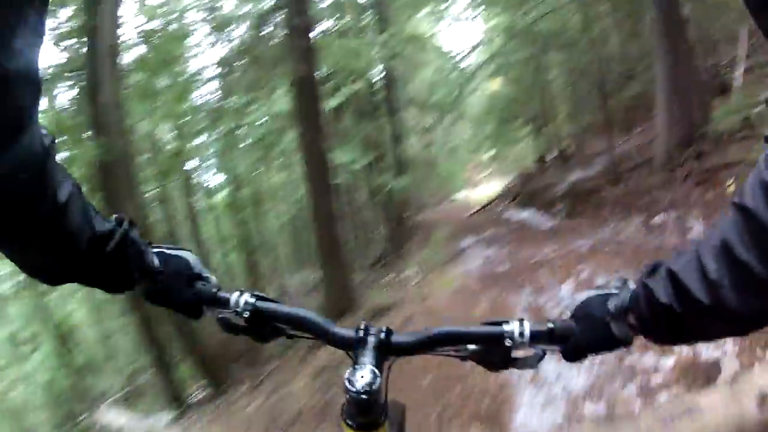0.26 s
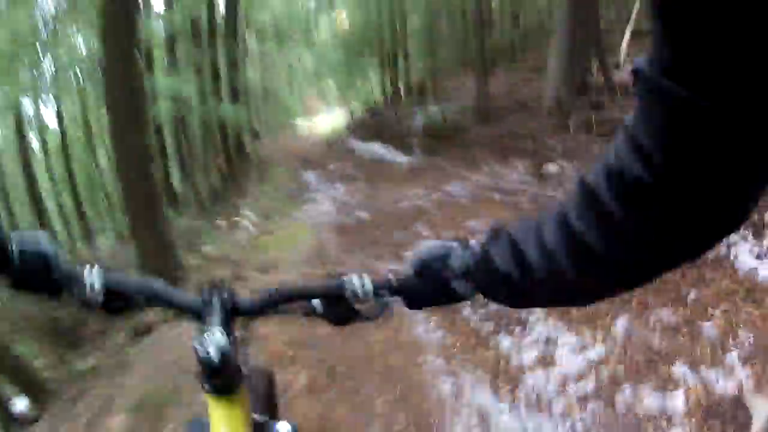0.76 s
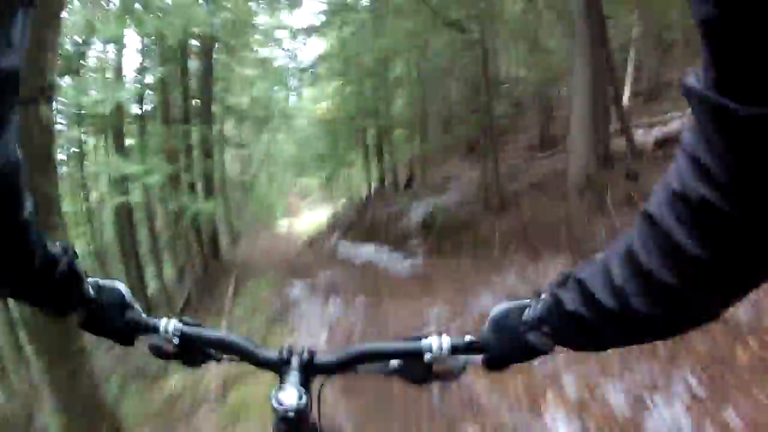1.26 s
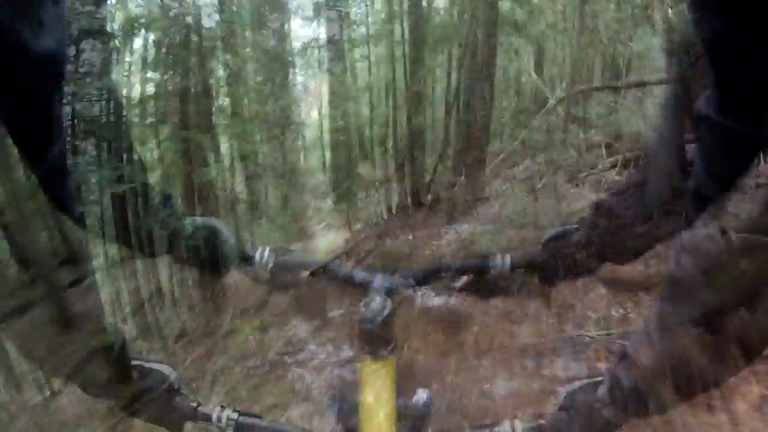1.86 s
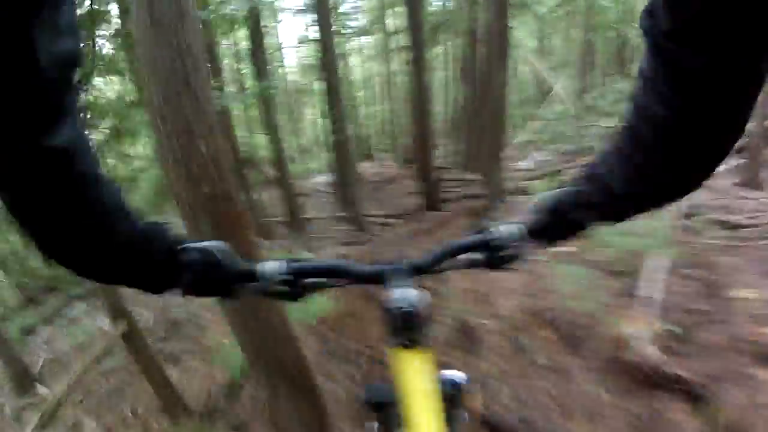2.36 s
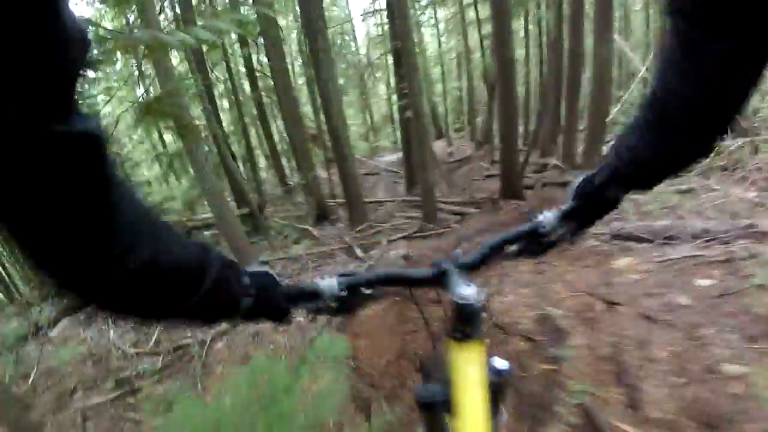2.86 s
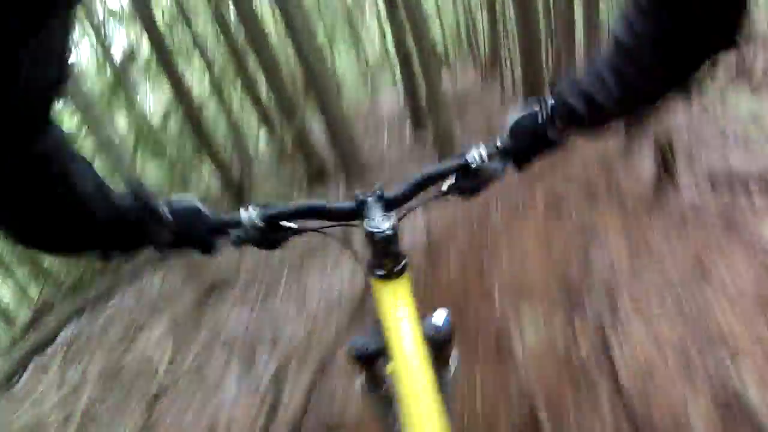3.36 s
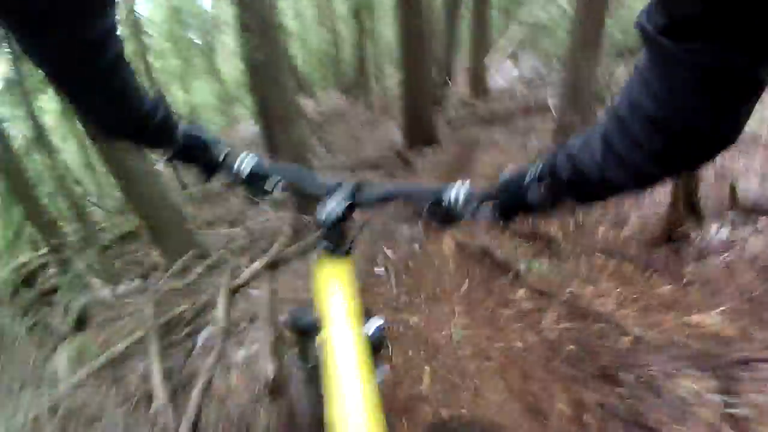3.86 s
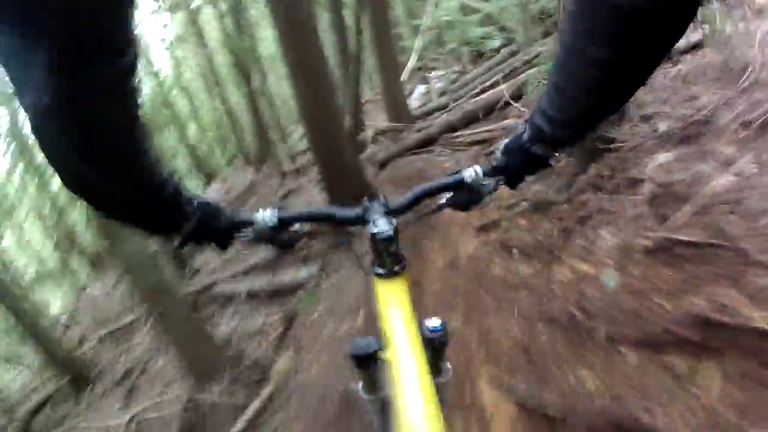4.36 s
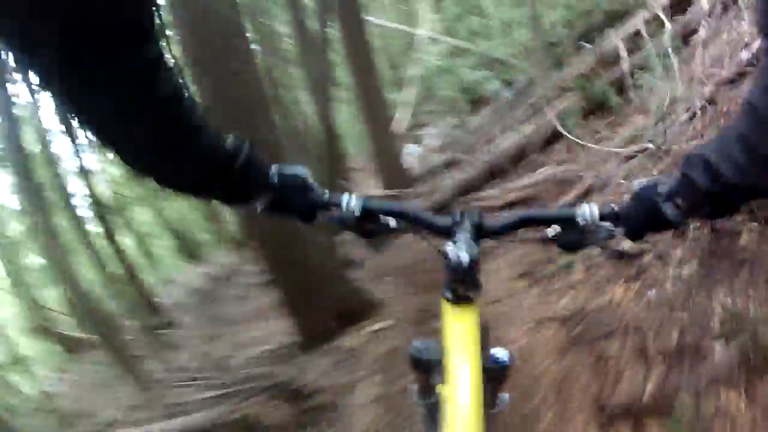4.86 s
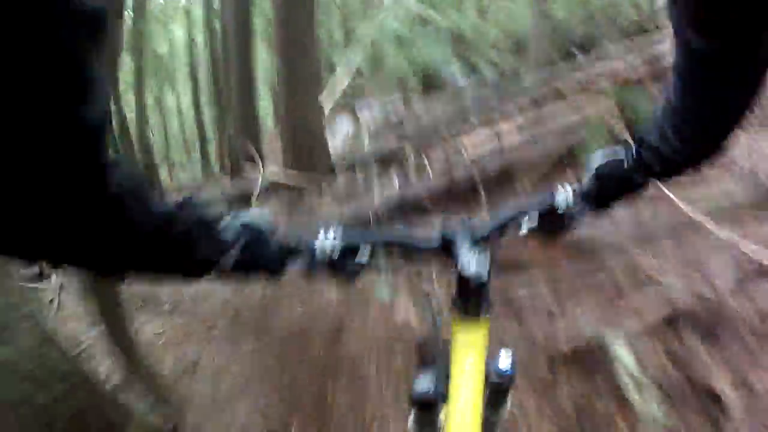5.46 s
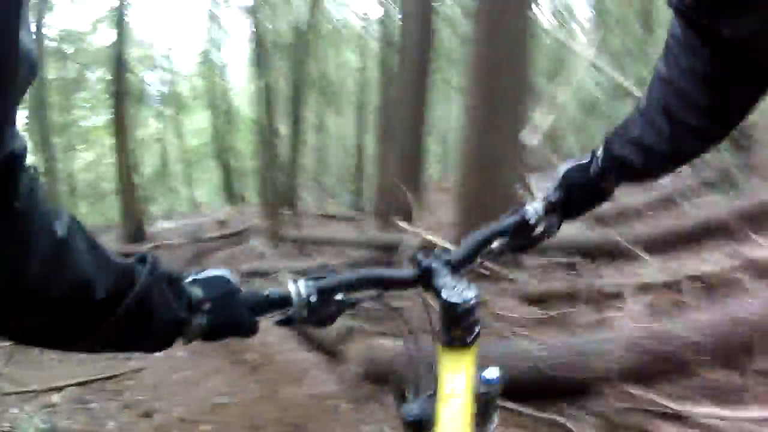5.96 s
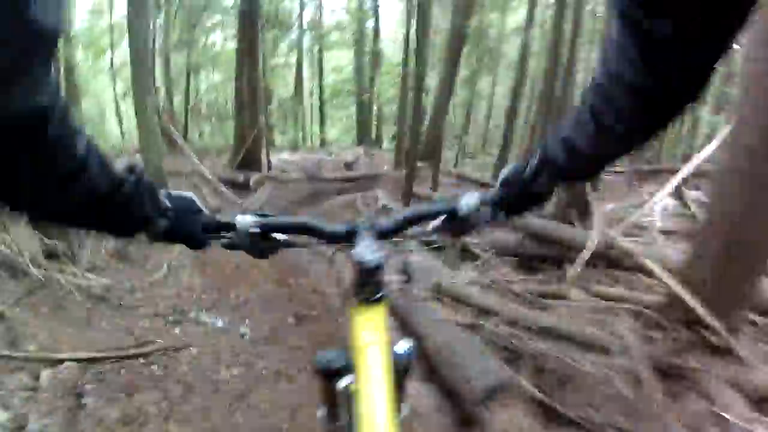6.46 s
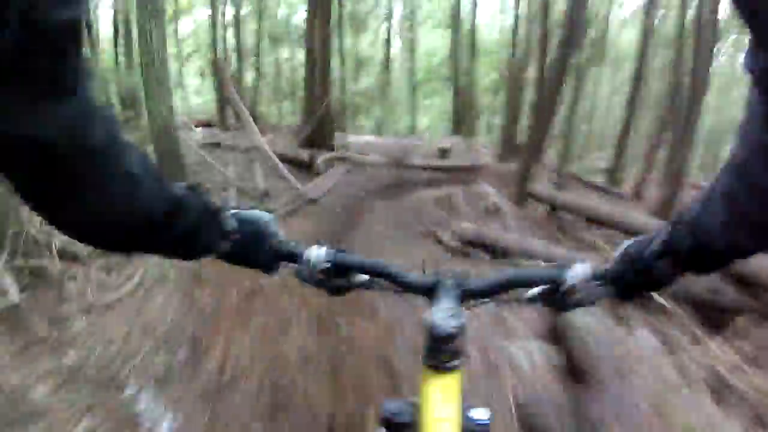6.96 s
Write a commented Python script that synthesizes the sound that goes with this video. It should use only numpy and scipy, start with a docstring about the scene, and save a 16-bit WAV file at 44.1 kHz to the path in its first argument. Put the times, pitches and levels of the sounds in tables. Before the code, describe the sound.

A camera's plastic housing knocks and rattles on a rider's chest, with soft scrapes, low wind rumble and tiny chain ticks beneath.

```python
"""Jolts make a chest mount clack and thump a camera's closed plastic housing on a rooty forest descent by bicycle.
Noise bursts ring the housing's resonances for the clacks; short decaying sine swings with a knock make the thumps.
Straps and tyres scrape as resonant noise, the chain pings, and shaped noise is wind, body sway, shudder and hiss.
The converter holds each 12 kHz sample, so images of the sound fold up above 6 kHz, mirrored around 12 kHz."""
import sys
import numpy as np
from scipy import signal
from scipy.fft import rfft, irfft, next_fast_len
from scipy.io import wavfile
from scipy.ndimage import uniform_filter1d, map_coordinates

SR = 44100
rng = np.random.default_rng(int(sys.argv[2]) if len(sys.argv) > 2 else 0)


def voltage_ratio(decibels):
    """Convert decibels (scalar or array-like) to amplitude ratios, 20 dB per decade."""
    exponent = np.asarray(decibels, float) / 20
    return 10 ** exponent


def dump_mix(stems):
    """Bounce the given channels to the path in sys.argv[1] as a 16-bit WAV at rate SR."""
    frames = np.atleast_2d(stems).T  # one column per channel
    limited = np.clip(frames, -1, 1)  # hard clip at full scale
    pcm = np.round(limited * 32767).astype(np.int16)
    wavfile.write(sys.argv[1], SR, pcm)


N = 317961

# mount clacks; brightness and hollowness are lens and door peaks over the shell peak:
# (time [s], shell peak [dB], chatter length [ms], brightness [dB], hollowness [dB])
MOUNT_CLACKS = [(0.85, -39.5, 0.58, -10, 10), (0.9588, -13.5, 0.65, -36, -6.5),
                (0.9633, -18.5, 0.33, -4.5, -16), (1.0147, -42.5, 5, 2.5, -19), (1.177, -43.5, 0.3, 2, -12),
                (1.232, -32.5, 0.19, 4, -20), (1.248, -36.5, 0.18, 10, -23), (1.2792, -23, 1.5, -23, -2.5),
                (1.2951, -23, 0.68, -25, -5), (1.2986, -1.5, 0.27, -9.5, -26),
                (1.449, -43.5, 0.66, 5.5, -15), (1.5133, -24, 1.4, -11.5, -10.5),
                (1.9427, -21.5, 2.4, -16.5, -12), (2.3594, -10, 0.26, -20.5, -9),
                (2.3886, -36.5, 0.33, -5, -6), (2.5466, 0, 2.2, -5, -5), (2.5733, -36, 0.55, -21, 3),
                (2.8079, -18, 0.44, -19, -5), (2.841, -24, 1, -9.5, -3.5), (2.9741, -25, 1.2, -26, -5),
                (3.076, -31.5, 0.34, -27, 0), (3.3272, -10, 1.1, -22, -9), (3.3619, -33, 0.99, 2, -11),
                (3.429, -38.5, 0.48, 4, -14), (3.4464, -23, 0.37, -25, -4), (3.4817, -29.5, 4.5, -14, 1.5),
                (3.532, -19, 1.3, -31, -1), (4.025, -40.5, 0.26, -0.5, -2.5),
                (4.169, -9.5, 0.46, -27, -9.5), (4.3366, -8, 0.9, -20, -9.5),
                (4.5465, -4, 0.55, -24.5, -12), (4.7864, -9, 3.2, -6, -1), (4.8022, -29, 1.7, -2, -17),
                (5.1065, -38, 0.89, -2.5, -17), (5.1901, -9, 1.3, -1.5, 1), (5.411, -18, 1.5, -4.5, -0.5),
                (5.4205, -31, 1.3, -4, 8), (5.464, -31.5, 0.55, -18, -1), (5.6122, -41, 0.37, -1, 8),
                (5.6784, -37.5, 1.2, -27, 5), (5.952, -35, 0.45, -5.5, 0.5), (6.1017, -39.5, 1.8, -11, 3.5),
                (6.1831, -28.5, 1.4, -18, -2.5), (6.4877, -20.5, 1.7, -17, -6.5),
                (6.6754, -15, 2.3, -17, -13.5), (6.6909, -6.5, 0.73, -15, -10),
                (6.8502, -33, 7.9, -10, 0.5), (6.981, -37.5, 3.4, -0.5, 2.5)]
# soft jolts of the body against the housing: (time [s], swing peak [dB], pitch [Hz])
BODY_THUMPS = [(0.565, -22, 176), (0.6796, -25.5, 197), (0.7328, -31, 178), (0.857, -25, 215),
               (0.9616, -18, 188), (1.2652, -25, 169), (1.284, -22, 120), (1.3016, -1, 137),
               (1.514, -27, 217), (1.7674, -24, 204), (1.9449, -19, 226), (2.207, -28.5, 150),
               (2.3616, -28.5, 340), (2.5192, -26.5, 220), (2.5484, -7, 321), (2.5528, -27, 118),
               (2.8096, -26, 176), (2.8416, -27, 403), (2.9517, -25, 210), (3.0478, -20.5, 211),
               (3.094, -26.5, 220), (3.4479, -18.5, 265), (3.5384, -15, 198), (4.4027, -18.5, 236),
               (4.5486, -24.5, 196), (4.7891, -9.5, 214), (4.795, -24.5, 150), (4.8715, -29, 168),
               (5.0404, -25.5, 392), (5.0717, -26, 217), (5.1918, -13.5, 307), (5.4127, -20, 420),
               (5.469, -22, 184), (5.527, -28.5, 198), (5.6133, -28, 334), (5.7016, -26, 155),
               (6.1015, -23, 168), (6.1836, -25, 173), (6.491, -20.5, 235), (6.6772, -15.5, 207),
               (6.734, -26, 197), (6.7736, -22.5, 171), (6.8609, -23.5, 217), (6.9157, -23, 218),
               (6.9848, -21, 185)]
# straps and tyres scuff; body is the back plate's drive over the shell's:
# (time [s], length [ms], shell drive [dB], body [dB])
STRAP_SCUFFS = [(0.278, 62, -48, -16.5), (0.366, 130, -53.5, -10), (0.542, 21, -44.5, -11),
                (0.615, 44, -37.5, -15.5), (0.689, 88, -40, -16.5), (0.981, 54, -45.5, -14.5),
                (1.245, 46, -44, -19), (1.591, 48, -52, -2.5), (2.193, 110, -50, -15),
                (2.922, 66, -44, 0.5), (3.015, 100, -46.5, -11), (3.173, 59, -45.5, -10),
                (3.361, 25, -44, -11), (3.44, 43, -46.5, -7), (3.473, 74, -39, -8.5), (3.694, 24, -45, -15),
                (3.772, 45.6, -44, -1), (4.16, 56, -45.5, -4), (4.264, 120, -43.5, -4),
                (4.44, 73, -45.5, -5), (4.544, 57, -45, -13), (4.645, 96, -42, -1.5), (4.723, 70, -44, -12),
                (4.791, 28.7, -36, 6), (5.023, 35.4, -44, -0.5), (5.293, 51, -49, -2),
                (5.437, 78, -50.5, -3), (5.521, 30.5, -45, 0), (5.67, 25, -49.5, 6), (5.836, 16, -49, -8.5),
                (6.091, 43, -47, -7.5), (6.149, 30, -47, -3), (6.301, 32, -51.5, -11),
                (6.391, 46.6, -40.5, -14), (6.482, 82, -49.5, -14), (6.651, 37, -48.5, -2.5),
                (6.819, 104, -46, -12), (7.179, 40, -42, -13.5)]
# drive of tyres rolling on dirt: (time [s], level [dB])
TYRE_ROLL = [(0.0, -64.5), (0.82, -54.5), (1.5, -59), (1.82, -56), (2.34, -57), (2.75, -60), (3.57, -50),
             (3.99, -57), (4.23, -52), (4.35, -51.5), (4.61, -52), (4.83, -52.5), (5.03, -57.5),
             (5.35, -57.5), (6.08, -53), (6.36, -64.5), (7.08, -48.5), (7.2, -53)]
# small bright chain ticks: (time [s], peak [dB], pitch [Hz])
CHAIN_TICKS = [(3.115, -40, 5100), (3.314, -48, 5160), (3.4017, -48, 5750), (3.5523, -36.5, 5080),
               (3.633, -47.5, 5400), (3.7214, -49, 5720), (4.121, -47, 5300), (4.3271, -46, 5270),
               (5.662, -51, 5100), (5.7763, -49, 4830)]
# roughness of the ground, which shudders the frame: (time [s], level [dB])
GROUND_ROUGHNESS = [(0.0, -61.5), (0.38, -59.5), (0.6, -54), (0.8, -45), (1.08, -55.5), (2.85, -53),
                    (3.13, -49.5), (3.85, -50), (4.31, -45.5), (4.71, -40), (4.85, -55.5), (6.02, -47.5),
                    (6.17, -60), (6.42, -50), (6.6, -54), (7.2, -51)]
# low sound of wind and body sway: (time [s], level [dB])
RUMBLE_LEVEL = [(0.0, -51.5), (0.64, -42.5), (0.72, -27.5), (0.78, -38), (1.24, -45.5), (1.28, -34.5),
                (1.7, -46), (2.45, -38), (2.89, -45), (2.97, -23.5), (3.13, -37), (3.45, -29),
                (3.49, -15.5), (3.57, -34.5), (4.61, -32.5), (5.33, -48.5), (5.47, -32), (5.54, -44),
                (6.0, -34), (6.38, -47), (6.48, -29), (6.62, -47), (6.68, -26), (7.02, -36), (7.04, -43),
                (7.2, -39.5)]
# resonances of the housing shell: (frequency [Hz], width [Hz], level [dB])
SHELL_MODES = [(1753, 198, -1), (2146, 186, -0.5), (2464, 116, -8)]
# resonances of the lens: (frequency [Hz], width [Hz], level [dB])
LENS_MODES = [(3050, 640, -18), (3554, 213, -6.5)]
# air gap behind the lens: (frequency [Hz], width [Hz], level [dB])
GAP_MODES = [(5100, 790, 0)]
# the housing's back door: (frequency [Hz], width [Hz], level [dB])
DOOR_MODES = [(1129, 101, 0.5), (1249, 106, 1), (1377, 108, -2.5)]
# the housing's back plate: (frequency [Hz], width [Hz], level [dB])
PLATE_MODES = [(420, 140, -5.5), (676, 71, 1.5), (765, 460, -6.5)]
# spectrum of the wind and sway: (frequency [Hz], density [dB per Hz])
RUMBLE_SPECTRUM = [(7.1, -11), (12, 1), (29, 2), (39, -9), (60, -14), (90, -19), (120, -40), (200, -120)]
# spectrum of the frame's shudder: (frequency [Hz], density [dB per Hz])
SHUDDER_SPECTRUM = [(35, -29), (60, 2), (139, 1), (250, -8), (364, -13), (488, -35), (795, -31),
                    (900, -35.5), (1170, -100), (1980, -120)]
# spectrum of the faint hiss: (frequency [Hz], density [dB per Hz])
HISS_SPECTRUM = [(240, -17), (400, 4), (963, 3.5), (1870, 11.5), (2510, 9), (2770, -11), (3510, 10),
                 (4210, -9.5), (5900, -57), (7670, -56), (13000, -120)]


def unit(x):
    """Scaled to rms 1."""
    return x / np.sqrt(np.mean(x ** 2) + 1e-20)


def peaked(x):
    """Scaled to peak 1."""
    return x / np.abs(x).max()


def curve(rows):
    """One level per sample, in straight lines between (time, level) points."""
    seconds, level = np.transpose(rows)
    return np.interp(np.arange(N) / SR, seconds, level)


def wobble(rate):
    """A smooth random curve, rate knots a second."""
    knots = rng.standard_normal(int(N * rate / SR) + 4)
    return map_coordinates(knots, [np.arange(N) * rate / SR])


def filtered(x, response):
    """x times a complex response of frequency."""
    m = next_fast_len(len(x) + 8192)
    return irfft(rfft(x, m) * response(np.fft.rfftfreq(m, 1 / SR)), m)[:len(x)]


def coloured(points):
    """Noise of rms 1 with its spectrum drawn over log frequency."""
    hz, db = np.transpose(points)
    shape = lambda f: voltage_ratio(np.interp(np.log(f + 1), np.log(hz + 1), db))
    return unit(filtered(rng.standard_normal(N), shape))


def resonant(x, modes):
    """x through parallel causal resonances of alternating sign."""
    def response(f):
        total = 0
        for k, (centre, width, db) in enumerate(modes):
            damping = 1j * f * width
            total = total + (-1) ** k * voltage_ratio(db) * damping / (centre * centre - f * f + damping)
        return total
    return filtered(x, response)


def softened(x, hz):
    """A steep causal low-pass: plastic on plastic is a soft contact."""
    return filtered(x, lambda f: 1 / (1 + (1j * f / hz) ** 2 + .9j * f / hz) ** 2)


def clacks():
    """Each jolt chatters briefly against the housing, which rings; loose parts rattle on, fading 60 dB in 20 ms."""
    out, t = np.zeros(N + SR), np.arange(SR // 16) / SR
    chatter = rng.standard_normal((len(MOUNT_CLACKS), len(t)))
    for (s, db, ms, bright_db, hollow_db), noise in zip(MOUNT_CLACKS, chatter):
        rattle = voltage_ratio(-13.5 - 60 * t / 0.02)
        blows = noise * (np.exp(-(1000 * t / max(ms, .1)) ** 2) + rattle)
        soft = softened(softened(blows, 2350), 6100)
        crack_db = 1.4 * bright_db - 6.5  # bright blows also crack at the top
        shell = peaked(resonant(soft, SHELL_MODES))
        door = peaked(resonant(soft, DOOR_MODES))
        lens = peaked(softened(resonant(blows, LENS_MODES), 5530))
        crack = peaked(resonant(blows, GAP_MODES))
        clack = shell + voltage_ratio(hollow_db) * door + voltage_ratio(bright_db) * lens + voltage_ratio(crack_db) * crack
        out[round(s * SR):][:len(t)] += voltage_ratio(db) * clack
    return out[:N]


def patter():
    """Faint chance jolts, stronger on rougher ground, as (time, peak, pitch) rows."""
    per_s, over_rough_db, pitch_hz = 5.5, 14.5, 170
    place, weakness, pitch = rng.random((int(per_s * N / SR), 3)).T
    at = (place * (N - 2000)).astype(int) + 1000
    db = curve(GROUND_ROUGHNESS)[at] + over_rough_db - 8 * weakness
    return np.transpose([at / SR, db, pitch_hz * (.7 + .6 * pitch)])


def thumps():
    """A push swings the housing low in either direction, fades in about two cycles and knocks the back plate."""
    out, t = np.zeros(N + SR), np.arange(SR // 8) / SR
    jolts = [*BODY_THUMPS, *patter()]
    for (s, db, hz), noise in zip(jolts, rng.standard_normal((len(jolts), len(t)))):
        cycles = hz * t
        envelope = (1 - np.exp(-8 * cycles)) * np.exp(-1.9 * cycles)
        swing = np.sign(noise[0]) * np.sin(2 * np.pi * cycles) * envelope
        knock = softened(resonant(noise * np.exp(-t / 0.0021), PLATE_MODES), 1080)
        thump = peaked(swing) + voltage_ratio(-14.5) * peaked(knock)
        start = round((s - .3 / hz) * SR)  # the swing crests near the listed time
        out[start:][:len(t)] += voltage_ratio(db) * thump
    return out[:N]


def scrape_drive():
    """Drive of shell, lens and plate: steady rolling, faint chance brushes, and scuffs that take its place."""
    brushes_per_s, mean_brush_ms, mean_brush_db = 8.4, 19, 2.5
    roll = voltage_ratio(curve(TYRE_ROLL) + 1.82 * wobble(18))
    drive = roll * voltage_ratio([[0.5], [-6], [-9]])
    for at, length, size in rng.random((int(brushes_per_s * N / SR), 3)):
        samples = int(2 * length * mean_brush_ms * SR / 1000)
        drive[:, int(at * N):][:, :samples] *= voltage_ratio(2 * size * mean_brush_db)
    for s, ms, db, body_db in STRAP_SCUFFS:
        bright_db = -8.5 - 0.092 * body_db + 0.13 * (db + 44.5)  # body dulls, force brightens
        span = slice(round(s * SR), round((s + ms / 1000) * SR))
        drive[:, span] = voltage_ratio(db + np.array([[0], [bright_db], [body_db]]))
    return uniform_filter1d(drive, 350, axis=1)  # scuffs start and stop within 8 ms


def scuffs():
    """Grit excites the housing's resonances: steadily under the tyres, in bursts at each scuff."""
    shell, lens, plate = scrape_drive()
    clumps = voltage_ratio(1.75 * wobble(70) + 2.3 * wobble(350))  # debris crackles in clumps

    def grit(modes, hz):
        """Clumped noise of rms 1 through modes, with its own slow unevenness."""
        uneven = voltage_ratio(1.65 * wobble(30) + 0.87 * wobble(12))
        noise = clumps * uneven * rng.standard_normal(N)
        return unit(softened(resonant(noise, modes), hz))

    rub = voltage_ratio(-3.0) * shell * grit(SHELL_MODES, 2960)
    door = voltage_ratio(-3.0) * np.sqrt(shell * plate) * grit(DOOR_MODES, 2300)
    edge = voltage_ratio(-1.5) * lens * grit(SHELL_MODES[2:], 3240)  # bright rubbing favours the highest shell mode
    bright = lens * grit(LENS_MODES, 4300)
    glint = voltage_ratio(-12) * lens * grit(LENS_MODES[1:], 5400)
    body = plate * grit(PLATE_MODES, 2120)
    spray = np.sqrt(voltage_ratio(-76.5) * lens) * grit(GAP_MODES, 7800)  # fine spray rises half as many dB
    stones = (rng.random(N) < 25 / SR) * rng.standard_normal(N)  # about 25 stray stones a second
    pebbles = resonant(stones * voltage_ratio(20) * shell, [*SHELL_MODES, *LENS_MODES])
    return rub + door + edge + bright + glint + body + spray + pebbles


def ticks():
    """Small steel chain parts ping roughly for a few ms: decaying noise through one resonance."""
    out, t = np.zeros(N + SR), np.arange(SR // 32) / SR
    for (s, db, hz), noise in zip(CHAIN_TICKS, rng.standard_normal((len(CHAIN_TICKS), len(t)))):
        ping = resonant(noise * np.exp(-t / 0.0065), [(hz, 220, 0)])
        out[round(s * SR):][:len(t)] += voltage_ratio(db) * peaked(ping)
    return out[:N]


def shudder():
    """The frame shudders in lumps with the rough ground, and swells for a moment around each body thump."""
    heave_db, heave_s = -24, 0.021  # level relative to the thump; half-width of the swell
    t = np.arange(N) / SR
    heave = sum(voltage_ratio(db + heave_db) * np.exp(-((t - s) / heave_s) ** 2) for s, db, hz in BODY_THUMPS)
    lumps = unit(voltage_ratio(4.0 * wobble(25) + 1.1 * wobble(12.0)))
    return (voltage_ratio(curve(GROUND_ROUGHNESS) + 4.0) * lumps + heave) * coloured(SHUDDER_SPECTRUM)


def rumble():
    """Wind and body sway: low noise with a restless level."""
    return voltage_ratio(curve(RUMBLE_LEVEL)) * unit(voltage_ratio(2.3 * wobble(10)) * coloured(RUMBLE_SPECTRUM))


def hiss():
    """A faint, slowly wavering noise lies under all."""
    return voltage_ratio(-61.0 + 0.32 * wobble(2.7)) * coloured(HISS_SPECTRUM)


def scene():
    """Sums the mount, straps, tyres, chain, frame, wind and hiss into one channel."""
    return (clacks() + thumps() + scuffs() + ticks() + shudder() + rumble() + hiss())[None]


def roll_off(x):
    """The treble ends steeply here."""
    return signal.sosfilt(signal.butter(12, 16510, fs=SR, output="sos"), x)


def record(dry):
    """Gain control ducks after loud blows; 12 kHz samples are each held four steps of 48 kHz, then rolled off."""
    release = np.exp(-1 / (0.09 * SR))  # 90 ms
    loudness = signal.lfilter([1 - release], [1, -release], dry ** 2)
    ducked = np.clip(dry / (1 + 25 * loudness), -.9, .9)
    slow = signal.resample_poly(ducked, 40, 147, axis=1, window=("kaiser", 2.5))  # to 12 kHz, loosely filtered
    held = np.repeat(slow, 4, axis=1)
    back = signal.resample_poly(held, 147, 160, axis=1)[0]  # 48 kHz to SR
    mix = filtered(np.resize(back, N), lambda f: 1 / (1 + (f / 15100) ** 40))
    return roll_off(mix[None])


dry = scene()
out = record(dry)
dump_mix(out)
```